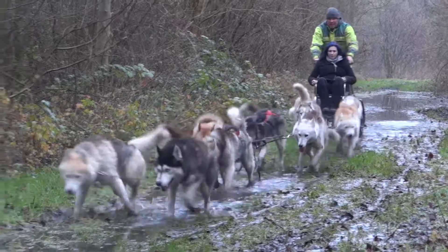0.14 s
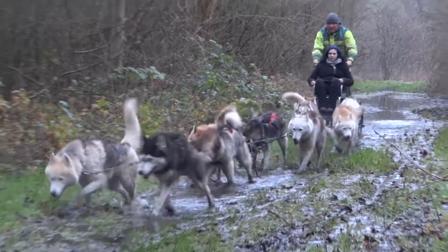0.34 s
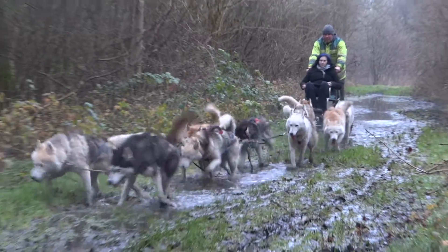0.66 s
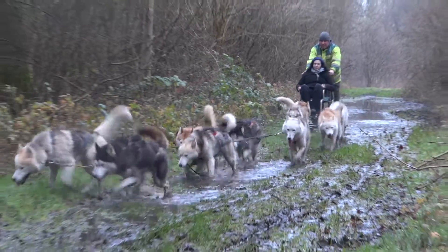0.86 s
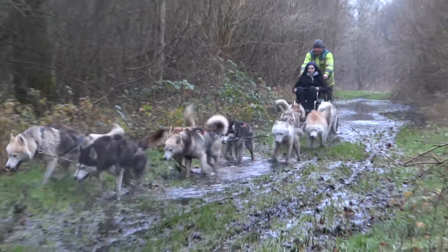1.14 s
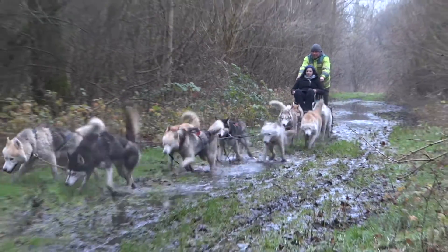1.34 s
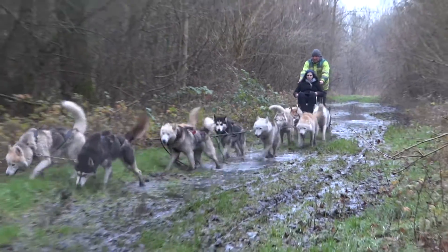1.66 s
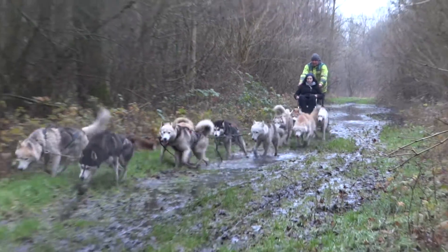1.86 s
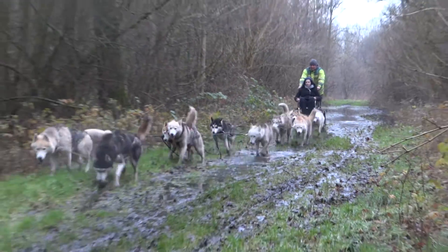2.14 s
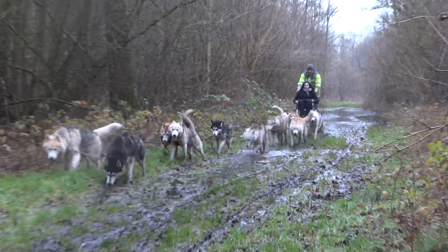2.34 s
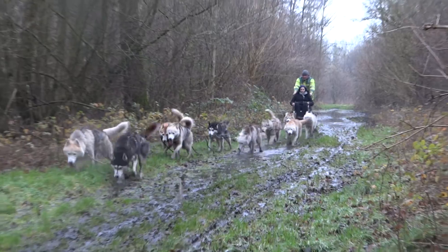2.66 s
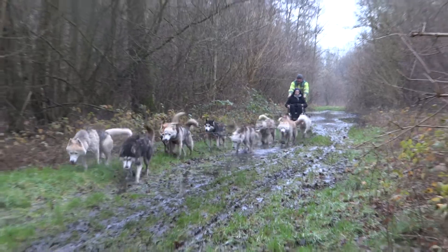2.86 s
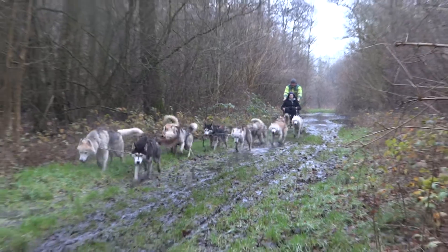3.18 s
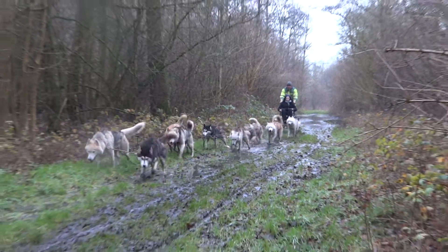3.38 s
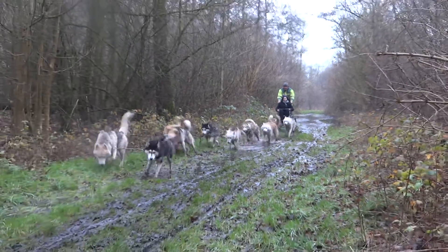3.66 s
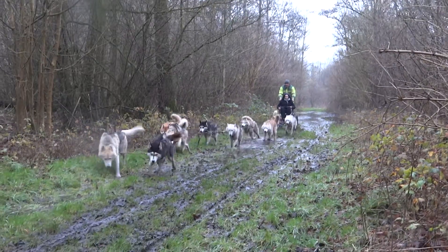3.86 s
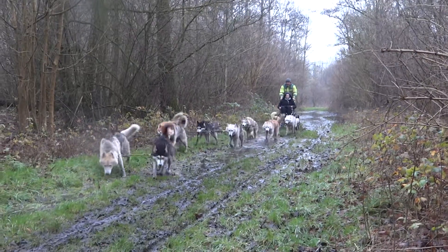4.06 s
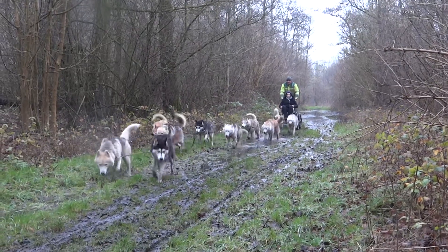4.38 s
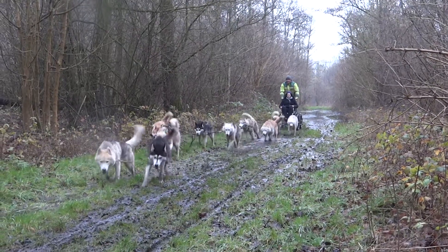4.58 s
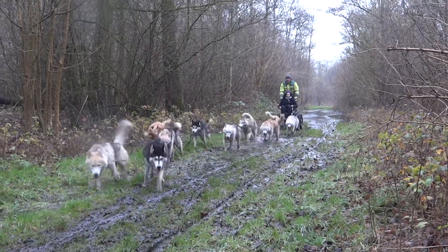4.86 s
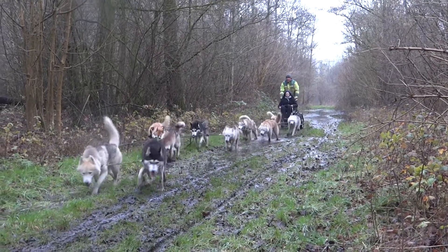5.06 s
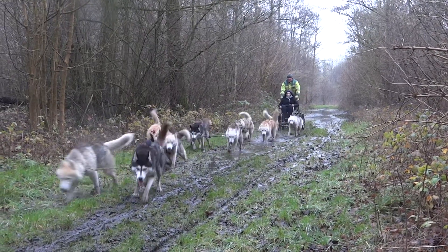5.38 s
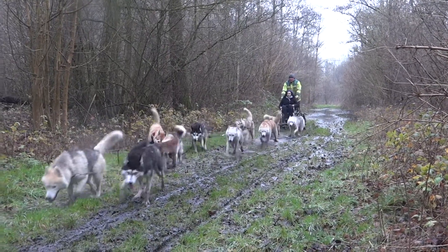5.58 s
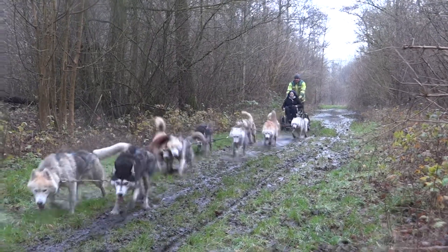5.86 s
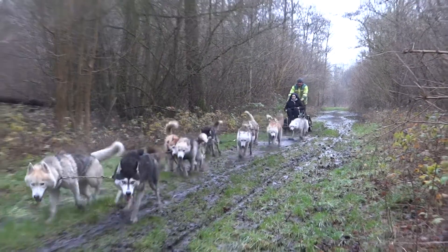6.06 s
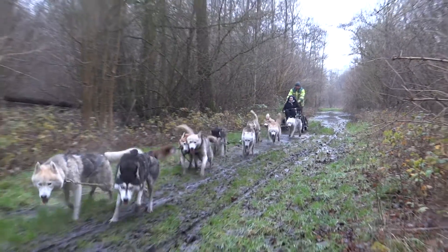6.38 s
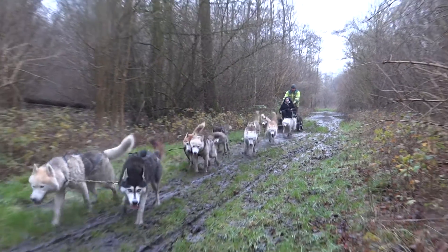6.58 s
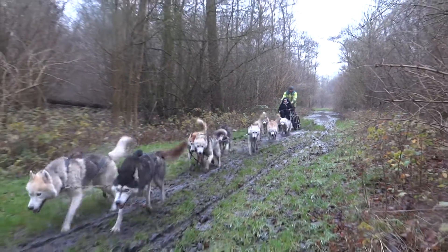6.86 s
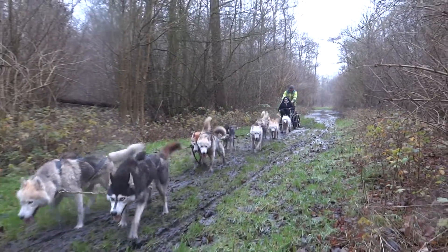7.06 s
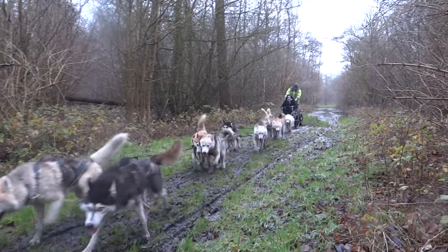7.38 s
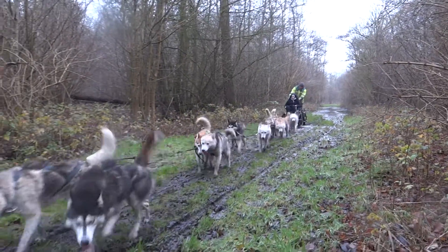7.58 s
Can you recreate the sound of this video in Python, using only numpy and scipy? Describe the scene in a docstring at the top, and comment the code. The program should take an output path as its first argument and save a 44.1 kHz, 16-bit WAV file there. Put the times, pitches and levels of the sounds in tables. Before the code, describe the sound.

On a muddy woodland track, many dog paws patter through wet ground and shallow puddles over a continuous squelching, bubbling churn. At 0 s it opens with a cluster of wet slaps and spray, with two faint breath puffs before 1 s. From about 1 to 3 s the splashing thins and softens, leaving scattered small splats, clearest near 2.7 s. From 3.5 s it builds again, with denser steps, crisp drop ticks and bright spray. Short husky dog pants come at about 4.4, 4.8, 5.1 and 5.4 s. The splashing peaks around 5.6-5.9 s, close and heavy, with hollow plops. Near 6.6 s a small woody knock sounds; more pants follow until 7.5 s among close, separate paw splashes, easing slightly. Behind is a soft forest hush, a faint wavering distant roar and barely audible engine drone. Narrow stereo, dry, with faint tree echo.

```python
"""A muddy forest track: a team of sled dogs pulls a cart toward closely spaced microphones.
Paws are filtered bursts of random clicks; mud, squelch and water are clouds of tiny rings over noise.
The churn thins, then grows as the team comes closer; the lead dog's panting is filtered noise puffs.
Bubbles and pockets in the mud plop, heavy drops tick and one woody knock rings, with echo from the trees.
Behind lie the noise hush of the wood, a far engine's wavering drones, a husky hum and a narrow roar."""
import sys
import numpy as np
from scipy import signal
from scipy.io import wavfile

SR = 44100
rng = np.random.default_rng(int(sys.argv[2]) if len(sys.argv) > 2 else 0)


def put_to_file(sound):
    """Save the sound as 16-bit audio at rate SR, in the file named by the first command-line argument."""
    columns = np.atleast_2d(sound).T  # one column per channel
    safe = np.clip(columns, -1, 1)
    whole_steps = np.round(safe * 32767)
    wavfile.write(sys.argv[1], SR, whole_steps.astype(np.int16))


N = 340893
TIME = np.arange(N) / SR
FREQS = np.fft.rfftfreq(N, 1 / SR)

# How hard the whole team works the ground, before each layer's own trim.
# Each row: time in seconds, churned mud in dB, squelch in dB, thrown water in dB.
TEAM = [(0.0, -50, -46, -45), (0.13, -48.5, -46, -48), (0.2, -50.5, -50.5, -52.5),
        (0.47, -53, -51.5, -52.5), (1.03, -52.5, -49.5, -50.5), (1.55, -54, -49.5, -52),
        (1.74, -52.5, -53, -54.5), (2.3, -54.5, -56.5, -59.5), (2.91, -52.5, -53.5, -53.5),
        (3.21, -52.5, -52, -53), (3.74, -51.5, -51.5, -55), (3.96, -49, -49.5, -49), (4.11, -49, -47, -47),
        (4.43, -47.5, -47.5, -48), (4.59, -47.5, -45.5, -44.5), (4.99, -46, -48.5, -48.5),
        (5.15, -47, -45, -44.5), (5.3, -46.5, -44.5, -43.5), (5.68, -46, -43.5, -44.5),
        (5.96, -50.5, -43, -44.5), (6.72, -51, -46.5, -45.5), (7.0, -53, -47.5, -46.5),
        (7.73, -50, -48.5, -49)]


def gain_of(db):
    """Decibels to amplitude."""
    return 10 ** (np.asarray(db) / 20)


def evened(x):
    """Scales to an rms of one."""
    return x / np.sqrt(np.mean(x ** 2) + 1e-20)


def read(points, hz):
    """A spectrum table, joined on a log-frequency axis."""
    f, value = np.transpose(points)
    return np.interp(np.log(hz + 1), np.log(f + 1), value)


def curves(rows):
    """The columns of a time table at every sample."""
    s, *columns = np.transpose(rows)
    return [np.interp(TIME, s, column) for column in columns]


def add(mix, s, sound):
    """Mixes a sound in from time s, or from the first sample if s is negative."""
    start = max(round(s * SR), 0)
    part = mix[..., start:][..., :sound.shape[-1]]
    part += sound[..., :part.shape[-1]]


def colour(x, db):
    """Causal, minimum-phase filter with the gain db on FREQS, so that clicks keep their sharp front."""
    taps_db = np.interp(np.fft.rfftfreq(4096, 1 / SR), FREQS, db)
    log_gain = np.log(gain_of(np.r_[taps_db, taps_db[-2:0:-1]]))
    # the Hilbert transform of the log gain gives the phase
    taps = np.fft.ifft(np.exp(np.conj(signal.hilbert(log_gain)))).real
    return signal.oaconvolve(x, taps[None, :len(taps) // 2], axes=1)[:, :N]


def resonate(x, hz, q):
    """A two-pole band-pass, its pitch capped and its q kept from falling too low."""
    hz = min(hz, SR / 4)
    return signal.lfilter(*signal.iirpeak(hz, max(q, 2.5 * hz / SR), SR), x)


def sweep(x, hz, width_hz):
    """A steep resonance that follows the curve hz: shift down to zero, low-pass, shift back."""
    turn = np.exp(2j * np.pi * np.cumsum(hz) / SR)
    low_pass = signal.butter(2, width_hz / 2, fs=SR, output="sos")
    return (turn * signal.sosfilt(low_pass, x / turn)).real


def ring(hz, db, decay):
    """One dying tone with a soft start."""
    t = np.arange(SR // 8) / SR
    envelope = (1 - np.exp(-2 * t * hz)) * np.exp(-t / decay)
    return gain_of(db) * envelope * np.sin(2 * np.pi * hz * t)


def drift(rate_hz):
    """Slow chance with an rms of one: random points, two per cycle of rate_hz, joined by lines."""
    knots = np.random.default_rng(rng.integers(2 ** 31)).standard_normal(4096)
    return evened(np.interp(TIME * rate_hz * 2, np.arange(len(knots)), knots))


def spread(pair):
    """Two unrelated signals become left and right of closely spaced microphones."""
    # Each row: frequency in Hz, left-right likeness from 0 to 1.
    likeness = [(60, 0.9), (130, 1), (270, 0.67), (560, 0.83), (1180, 0.7), (2490, 0.83), (5240, 0.94),
                (11000, 0.7)]
    same = np.clip(read(likeness, FREQS), 0, .995)
    mid = colour(pair[:1], 10 * np.log10((1 + same) / 2))
    side = colour(pair[1:], 10 * np.log10((1 - same) / 2))
    return np.vstack([mid + side, mid - side])


def droplets(per_s, lo_hz, hi_hz, cycles, spread_db, clump_db=1.0, width=0.34, size=256):
    """Tiny ringing drops and bubbles, each with its own pitch and loudness, falling in clumps."""
    t = np.arange(size) / SR
    crowd = gain_of(clump_db * drift(rate_hz=35))
    draws = np.random.default_rng(rng.integers(2 ** 31)).random((int(per_s * N / SR) + 1, 4))
    at, bulk, side, pitch = draws.T
    at = (at * N).astype(int)
    hz = lo_hz + (hi_hz - lo_hz) * pitch
    loudness = gain_of(spread_db * np.minimum(-np.log(1 - bulk), 4)) * crowd[at]
    turns = hz[:, None] * t
    # short rings hit harder, which keeps the spectrum even
    strength = (loudness * np.sqrt(hz))[:, None]
    rings = strength * np.exp(-turns / cycles) * np.sin(2 * np.pi * turns)
    where = (at[:, None] + np.arange(size)).ravel()
    pans = [1 + sign * width * (2 * side - 1) for sign in (1, -1)]
    return evened(np.array([np.bincount(where, (pan[:, None] * rings).ravel(), N)[:N] for pan in pans]))


def wet(grains, share, shape, flutter_db=1):
    """Near grains over a blur of farther ones, in one colour; share is the grains' part of the power."""
    share = np.clip(share, 0, 1)
    flutter = drift(rate_hz=30)
    blur = evened(spread(rng.standard_normal((2, N))) * gain_of(flutter_db * flutter))
    both = np.sqrt(share) * evened(grains) + np.sqrt(1 - share) * blur
    return evened(colour(both, read(shape, FREQS)))


def paws(slap_db=-2.0, spray_db=-2.5, slap_q=1.58, spray_q=1.7, smack_share=0.072, grit=0.54, width=0.31):
    """Each paw touches the water, smacks the mud and throws a burst of droplets; deep puddles last longer."""
    # The clearest paw falls and the mud they splat, before the trims slap_db and spray_db.
    # Each row: time in seconds, slap level in dB, slap pitch in Hz, spray level in dB,
    # spray pitch in Hz, splash decay in seconds.
    clear_paws = [(0.026, -46, 2980, -48, 7600.0, 0.008), (0.056, -41, 2200, -54, 6500, 0.05),
                  (0.087, -41, 1690.0, -43, 5000, 0.04), (0.133, -47, 1400, -43, 6000, 0.02),
                  (0.148, -42, 2010.0, -40, 6840, 0.047), (0.148, -53, 2980.0, -40.5, 7100.0, 0.002),
                  (0.32, -58, 2000, -43, 7300.0, 0.0071), (0.339, -48, 2600, -42, 6530, 0.022),
                  (0.364, -45, 1210, -50, 7000, 0.018), (0.414, -56, 2500, -57, 5500, 0.002),
                  (0.42, -63.0, 2250.0, -48, 7760, 0.003), (0.456, -54, 1520.0, -41, 6000.0, 0.02),
                  (0.558, -43, 1800, -59, 6000, 0.012), (0.575, -46, 2900, -59, 6000, 0.008),
                  (0.634, -41, 2900, -38, 5630, 0.022), (0.727, -43, 1270.0, -47, 7000.0, 0.007),
                  (0.744, -44, 1150, -51, 7000, 0.022), (0.834, -44.5, 1240, -49, 6400.0, 0.005),
                  (0.862, -49, 2320.0, -48, 7560, 0.0031), (0.947, -46.5, 2240.0, -44, 6700.0, 0.0035),
                  (0.962, -41, 2280.0, -35, 6700, 0.059), (1.001, -54.0, 2020.0, -42, 7200.0, 0.006),
                  (1.086, -56, 2400, -47, 6450, 0.003), (1.139, -47, 2810.0, -42, 5400.0, 0.0075),
                  (1.213, -53.5, 1940.0, -38.5, 6500, 0.049), (1.275, -47, 2700, -54, 6000, 0.004),
                  (1.339, -46, 2700, -53, 6000, 0.004), (1.403, -48, 1740.0, -43, 5570, 0.016),
                  (1.423, -45, 1600, -43, 5600, 0.0091), (1.556, -44, 1040, -48, 6000, 0.006),
                  (1.582, -52, 2390.0, -40, 5700.0, 0.028), (1.595, -50, 2700, -50, 5700, 0.0033),
                  (1.672, -46.5, 2500, -46, 5200.0, 0.009), (1.726, -52, 1750.0, -49, 5900.0, 0.008),
                  (1.756, -49, 2600, -61, 5900, 0.004), (1.893, -52, 1280.0, -49, 5500.0, 0.048),
                  (1.933, -56, 2300, -48, 6000, 0.0045), (1.955, -44, 2340, -41, 5500.0, 0.025),
                  (1.974, -56, 2300, -46, 6000, 0.0038), (1.992, -50, 2600, -48, 5500, 0.012),
                  (2.174, -52, 2600, -58, 6000, 0.004), (2.214, -55.5, 2170.0, -49.5, 6300.0, 0.038),
                  (2.296, -48, 1680, -43, 7100, 0.034), (2.383, -44, 1540.0, -48, 6900.0, 0.014),
                  (2.43, -53, 2340.0, -45, 4800, 0.014), (2.571, -53, 2400, -44, 8000.0, 0.0098),
                  (2.644, -60, 2400, -49, 6450, 0.003), (2.676, -56, 2400, -46, 6000, 0.003),
                  (2.686, -39.5, 2400, -38.5, 5570, 0.016), (2.72, -55, 2400, -46, 5960, 0.0055),
                  (2.739, -46, 2700, -52, 6000, 0.004), (2.845, -58, 1760.0, -48, 6500.0, 0.005),
                  (2.993, -60.0, 2020.0, -47, 5000.0, 0.006), (3.02, -61, 1290.0, -43.5, 5800, 0.011),
                  (3.074, -61, 2400.0, -45, 7800.0, 0.0055), (3.127, -58, 2200, -47, 5500, 0.0036),
                  (3.168, -60, 2060.0, -47, 7700.0, 0.004), (3.292, -44, 1500, -45.5, 5800.0, 0.015),
                  (3.334, -59.5, 1570.0, -39, 6600, 0.048), (3.391, -46, 1350.0, -43.5, 6360, 0.0022),
                  (3.485, -44, 2560.0, -42, 6400.0, 0.057), (3.507, -41.5, 2870, -57, 5000.0, 0.0035),
                  (3.665, -63, 1450.0, -48.0, 6700.0, 0.01), (3.694, -41, 2350, -39, 5700.0, 0.028),
                  (3.733, -44, 2600, -52, 5700, 0.005), (3.755, -46.5, 2430.0, -45, 5700.0, 0.0035),
                  (3.789, -63.0, 3000.0, -40, 6800, 0.017), (3.892, -50.5, 1220.0, -48.0, 7900.0, 0.006),
                  (3.936, -45, 2350.0, -45, 4430, 0.003), (3.955, -39, 2100.0, -45, 5300.0, 0.05),
                  (4.051, -45, 2190.0, -38, 5900.0, 0.017), (4.098, -42, 1920.0, -37, 5200, 0.019),
                  (4.19, -44, 1750.0, -41, 6500.0, 0.03), (4.214, -43.5, 2300, -51, 6000, 0.004),
                  (4.337, -45.0, 1600.0, -39.5, 7300.0, 0.019), (4.418, -50, 1400.0, -39.5, 5900.0, 0.046),
                  (4.462, -41, 2000.0, -40, 7700.0, 0.0082), (4.491, -45, 1290.0, -43, 7800.0, 0.0035),
                  (4.505, -54, 1900.0, -40, 7800.0, 0.033), (4.532, -42.5, 2140, -43, 6300.0, 0.003),
                  (4.615, -42, 1950.0, -38, 7260, 0.0035), (4.633, -51, 1850.0, -35, 7260, 0.0063),
                  (4.7, -39.5, 2100, -41, 6300.0, 0.003), (4.714, -52, 2200, -37, 6300, 0.017),
                  (4.818, -40, 2220.0, -39.5, 7240, 0.0088), (4.909, -37.5, 2400, -36, 7040, 0.011),
                  (4.925, -50, 2400, -36.5, 5500, 0.01), (4.978, -56, 2400, -49, 4600, 0.003),
                  (5.002, -46, 2010.0, -35, 6300.0, 0.016), (5.02, -36.5, 2270, -41, 5000, 0.003),
                  (5.026, -42, 2150, -50, 5300, 0.005), (5.117, -52, 1780.0, -40, 7400.0, 0.01),
                  (5.174, -45, 2100, -40, 5600, 0.013), (5.204, -48, 2200, -41, 6500, 0.004),
                  (5.283, -43, 2400, -48, 6000, 0.003), (5.299, -40, 2350.0, -34.5, 7750, 0.014),
                  (5.344, -35.5, 2240, -35.5, 6900.0, 0.0065), (5.389, -48.0, 1960.0, -42, 7300.0, 0.006),
                  (5.44, -45, 1710.0, -35, 6300.0, 0.014), (5.5, -41, 2720.0, -49, 5400.0, 0.0035),
                  (5.578, -35, 1760.0, -39, 7700.0, 0.015), (5.595, -40, 2400, -42, 6500, 0.005),
                  (5.683, -45, 1900, -31.5, 7100.0, 0.078), (5.714, -40.0, 1730.0, -36.5, 7100.0, 0.01),
                  (5.792, -33, 1380.0, -42, 8600.0, 0.011), (5.812, -39.5, 1780.0, -34, 8700.0, 0.017),
                  (5.87, -38, 2040.0, -29, 7150, 0.053), (5.892, -40, 2990.0, -34.5, 7800.0, 0.005),
                  (5.91, -36, 2210.0, -49, 6100.0, 0.004), (5.931, -38.5, 1240, -42, 6000, 0.0038),
                  (5.966, -50.0, 2000.0, -38, 5500.0, 0.018), (6.037, -54, 2050.0, -41.5, 6200.0, 0.016),
                  (6.055, -46, 2500, -48, 6000, 0.0027), (6.077, -51, 1910.0, -43.0, 5800.0, 0.0035),
                  (6.086, -60.0, 3000.0, -36.5, 7900.0, 0.006), (6.114, -50, 2500, -36, 6100.0, 0.013),
                  (6.121, -36.5, 2580, -42, 5500, 0.004), (6.192, -53, 2450.0, -39, 5600.0, 0.01),
                  (6.246, -38, 1800.0, -41, 4700.0, 0.013), (6.277, -48, 1780.0, -37, 5700.0, 0.006),
                  (6.301, -42, 2700, -40, 6300, 0.006), (6.417, -38.5, 2040.0, -32.5, 6800.0, 0.018),
                  (6.449, -50, 2270.0, -42, 7400.0, 0.002), (6.517, -37.5, 2300, -48, 5400.0, 0.007),
                  (6.592, -45, 1580.0, -46, 7360, 0.0039), (6.668, -57, 2320.0, -36, 6100, 0.011),
                  (6.802, -39.5, 2470.0, -41, 5800.0, 0.01), (6.824, -45, 1610.0, -34.0, 7900.0, 0.033),
                  (6.887, -36, 1660.0, -36, 6600.0, 0.026), (6.986, -42, 2320.0, -36, 5850, 0.037),
                  (7.003, -58.0, 2730.0, -37, 4870, 0.0035), (7.132, -37, 2150.0, -40, 6000, 0.03),
                  (7.177, -43, 1990, -42, 6500, 0.004), (7.229, -44, 1920.0, -40, 6840, 0.006),
                  (7.241, -48, 2000, -45, 6500, 0.003), (7.262, -38.5, 2700.0, -35, 7500, 0.023),
                  (7.36, -36, 2200, -42, 5000, 0.0076), (7.389, -45, 2300.0, -42, 5000.0, 0.016),
                  (7.478, -63, 1170.0, -40, 8200.0, 0.0079), (7.56, -49, 1640.0, -40, 7800, 0.0043),
                  (7.609, -60.5, 1840.0, -43, 6700.0, 0.01), (7.628, -56, 2000, -44, 6700, 0.004),
                  (7.644, -46, 2300, -50, 6000, 0.005)]
    smack_s = 0.0016  # decay of the smack
    touch_share = 0.24  # lead-in as the toes touch, as a share of the splash decay
    out, lead = np.zeros((2, N)), SR // 25
    t = np.arange(-lead, SR // 10) / SR
    smack = evened((t >= 0) * np.exp(-abs(t) / smack_s))
    share = np.clip(smack_share, 0, 1)
    for s, slap, slap_hz, spray, spray_hz, decay in list(clear_paws) + light_paws():
        splash = evened(np.exp(-abs(t) / np.where(t < 0, touch_share * decay, decay)))
        envelope = np.sqrt(share * smack ** 2 + (1 - share) * splash ** 2)
        lean = 1 + width * rng.uniform(-1, 1) * np.array([[1], [-1]])
        for db, hz, q in ((slap + slap_db, slap_hz, slap_q), (spray + spray_db, spray_hz, spray_q)):
            roughness = np.exp(grit * np.clip(rng.standard_normal(len(t)), -3, 3))
            clicks = rng.choice([-1, 1], len(t)) * roughness * envelope
            clumps = signal.resample(rng.standard_normal(70), len(t))
            clicks *= gain_of(2 * clumps)  # the water tears away in ragged clumps
            burst = resonate(resonate(clicks, hz, q), hz, q / 2)
            # every burst has the energy of 10 ms at its level
            burst *= np.sqrt(SR / 100) / np.linalg.norm(burst)
            add(out, s + t[0], lean * gain_of(db) * burst)
    return out


def light_paws(per_s=12, slap_db=-18, spray_db=-3.5, spread_db=6, slap_hz=2100, spray_hz=6200, decay_s=0.0022):
    """Paw rows for the rest of the team: random moments, with levels that follow squelch and water."""
    _, squelch_db, water_db = curves(TEAM)
    draws = np.random.default_rng(rng.integers(2 ** 31)).random((int(per_s * N / SR), 3))
    rows = []
    for moment, strength, depth in draws:
        i = int(moment * N)
        extra_db = spread_db * (2 * strength - 1)
        slap = squelch_db[i] + slap_db + extra_db
        spray = water_db[i] + spray_db + extra_db
        rows.append((i / SR, slap, slap_hz, spray, spray_hz, decay_s * (.5 + depth)))
    return rows


def churn(mud_db=1.82, squelch_db=4.0, water_db=2.5, hush_db=-54.0):
    """Many paws and the wheels: bubbling mud below, squelching in the middle, crackling water above."""
    # The colours of the three layers. Each row: frequency in Hz, relative level in dB.
    mud_shape, squelch_shape, water_shape = [(150, -52), (380, -18), (500, -9), (680, -0.5), (950, 1),
                                             (1500, -2.5), (2400, -6), (4000, -39), (9000, -59)], [(300, -25.5), (800, -4.5), (1400, -1.5),
                                                          (2500, 3), (4000, 2.5), (5000, 2), (6500, 1.5),
                                                          (11000, -37)], [(500, -76), (2500, -5),
                                                                           (4500, -3.5), (6000, 2),
                                                                           (8200, -1.5), (9400, -1.5),
                                                                           (10300, -5), (11200, -13)]
    mud_level, squelch_level, water_level = (gain_of(db) for db in curves(TEAM))
    # the mud only counts where it rises over the hush of the wood
    mud_level = np.sqrt(np.maximum(mud_level ** 2 - gain_of(hush_db) ** 2, gain_of(-72.0) ** 2))
    bubbles = droplets(per_s=1300, lo_hz=447.0, hi_hz=2662, cycles=7.1, spread_db=2.0, size=800)
    # bursting films of water click across the whole treble; trapped air rings a little longer
    clicks = droplets(per_s=1400, lo_hz=1200, hi_hz=11000, cycles=.7, spread_db=3.4, size=100)
    drips = droplets(per_s=1000, lo_hz=1300, hi_hz=9000, cycles=11, spread_db=2.5, size=800)
    crackle = clicks + gain_of(-2) * drips
    mud = wet(bubbles, share=0.4, shape=mud_shape)
    squelch = wet(crackle, share=0.77, shape=squelch_shape)
    water = wet(crackle, share=0.59, shape=water_shape)
    ground = gain_of(mud_db) * mud_level * mud + gain_of(squelch_db) * squelch_level * squelch
    return ground + gain_of(water_db) * water_level * water


def small_bubbles(db=-10):
    """Many small bubbles ping through the churn, their level following the squelch."""
    _, squelch_db, _ = curves(TEAM)
    pings = droplets(per_s=63, lo_hz=2804, hi_hz=8980, cycles=19, spread_db=2.5, clump_db=-1, size=1200)
    return gain_of(squelch_db + db) * pings


def plops(lowest_hz=200, decay_at_1khz_s=0.0066, size_law=0.55):
    """A bubble or a hollow pocket in the mud rings as it closes; larger, lower ones ring longer."""
    # The clearest plops, from low hollow pockets to small high bubbles.
    # Each row: time in seconds, pitch in Hz, level in dB before the high-pass.
    closings = [(0.026, 2950, -31), (0.075, 322, -49), (0.148, 747, -42), (0.632, 2650, -36),
                (0.638, 3250, -38), (3.109, 3370, -44), (4.135, 408, -44.5), (5.59, 576, -38.5),
                (5.774, 250, -48), (5.791, 1074, -30), (6.04, 2270, -36), (6.285, 1700, -31),
                (6.624, 284, -50), (6.987, 2470, -30.5), (7.263, 3000, -33), (7.36, 248, -51),
                (7.36, 966, -35)]
    out = np.zeros((2, N))
    for s, hz, db in closings:
        add(out, s, ring(hz, db, decay_at_1khz_s * (1000 / hz) ** size_law))
    return signal.sosfilt(signal.butter(2, lowest_hz, "highpass", fs=SR, output="sos"), out)


def drops(db=-5.5, patter=0.2, patter_s=0.00057):
    """A heavy drop hits a puddle: one crisp tick, then a moment of fine patter."""
    # Each row: time in seconds, peak level in dB before the trim db, pitch in Hz.
    heavy_drops = [(.0266, -33, 3200), (.148, -23, 7100), (.862, -22, 7500), (1.404, -29, 5000),
                   (2.302, -23, 7200), (3.168, -21.5, 8000), (3.7905, -20.5, 7000), (3.936, -21, 4370),
                   (4.099, -23, 4500), (4.338, -19, 7000), (4.505, -15, 7400), (4.6325, -16.5, 7400),
                   (4.7, -21.5, 5030), (4.817, -20, 7000), (4.9005, -24, 6500), (4.91, -34, 4000),
                   (5.173, -17, 7000), (5.301, -19, 6500), (5.3426, -30, 3500), (5.443, -22, 5000),
                   (5.579, -23, 1980), (5.792, -25, 1400), (5.812, -15, 8400), (5.8695, -17, 7000),
                   (5.894, -19, 7500), (5.967, -24, 6000), (6.251, -21, 4500), (6.277, -18, 6000),
                   (6.302, -13, 6300), (6.418, -20, 7500), (6.45, -23, 7500), (6.828, -20, 8500),
                   (6.631, -12, 7550), (6.888, -22, 7000), (7.003, -19, 5400), (7.2619, -17.5, 7800),
                   (7.3605, -22, 3000)]
    out, t = np.zeros((2, N)), np.arange(SR // 100) / SR
    for s, peak_db, hz in heavy_drops:
        hit = (t == 0) + patter * rng.standard_normal(len(t)) * np.exp(-t / patter_s)
        tick = resonate(resonate(hit, hz, 1.5), hz, .75)
        add(out, s, gain_of(peak_db + db) * tick / abs(tick).max())
    return out


def panting(throat_width_hz=430, muzzle_width_hz=560, chest_ratio=0.765, chest_db=-8, edges=0.46,
            lowest_hz=750, flutter_db=1.0, spit_per_s=220, spit_share=.25):
    """Puffs of air through the dog's wet throat and muzzle; the resonances slide as the jaw moves."""
    # The lead dog's breaths. Each row: middle in seconds, length in seconds, throat level in dB,
    # muzzle level in dB, throat pitch in Hz, muzzle pitch in Hz, glide as a share of the pitch.
    breaths = [(0.372, 0.077, -51.5, -62, 1260, 2500, 0.13), (0.75, 0.066, -49, -66, 1250, 2500, 0),
               (4.42, 0.085, -44, -53, 1410, 2500, -0.07), (4.774, 0.083, -53, -47.5, 1400, 3100, -0.075),
               (5.069, .13, -44, -53, 1550, 2600, -0.031), (5.416, .1, -44.5, -51, 1400, 2700, -0.022),
               (6.569, .135, -41.5, -47.5, 1660, 2390, -.1), (6.867, .09, -41.5, -56, 1520, 2500, 0.2),
               (7.188, 0.12, -45.5, -49, 1540, 2230, -0.27), (7.531, 0.11, -41, -51, 1580, 2420, 0.082)]
    out, share = np.zeros((2, N)), np.clip(spit_share, 0, 1)
    for s, length, throat_db, muzzle_db, throat_hz, muzzle_hz, glide in breaths:
        rush, pops = rng.standard_normal((2, SR // 2))[:, :int(length * SR)]
        # saliva crackles in the airflow
        spit = np.sign(pops) * (rng.random(SR // 2)[:len(rush)] < spit_per_s / SR)
        air = np.sqrt(1 - share) * rush + np.sqrt(share) * evened(spit)
        air = air * gain_of(flutter_db * drift(rate_hz=57.3)[:len(air)])  # the tongue flaps
        jaw = 1 + glide * np.linspace(-.5, .5, len(air))
        throat = (throat_db, throat_hz, throat_width_hz)
        chest = (throat_db + chest_db, throat_hz * chest_ratio, throat_width_hz)
        muzzle = (muzzle_db, muzzle_hz, muzzle_width_hz)
        for db, hz, width_hz in (throat, chest, muzzle):
            puff = evened(sweep(air, hz * jaw, width_hz))
            add(out, s - length / 2, gain_of(db) * puff * signal.windows.tukey(len(air), edges))
    return signal.sosfilt(signal.butter(2, lowest_hz, "highpass", fs=SR, output="sos"), out)


def clack(at_s=6.6255, lowest_hz=800, highest_hz=3400, order=3):
    """A paw knocks something hard close by, perhaps a stick: a few short, woody rings."""
    # Each row: pitch in Hz, level in dB before the band-pass, decay in seconds.
    modes = [(1130, -20, 0.0013), (2170, -11, 0.0014), (2850, -12.5, 0.00094)]
    out = np.zeros((2, N))
    add(out, at_s, sum(ring(*mode) for mode in modes))
    band = signal.butter(order, [lowest_hz, highest_hz], "bandpass", fs=SR, output="sos")
    return signal.sosfilt(band, out)


def trees(x, t60=0.071, count=6):
    """Trunks and undergrowth scatter a faint, short echo; its random patterns take turns, so no pitch stands out."""
    t, out = np.arange(SR // 4) / SR, np.zeros((2, N))
    for k in range(count):
        sparse = rng.standard_normal((2, len(t))) * (rng.random((2, len(t))) < 2000 / SR)
        taps = sparse * (t > .004) * gain_of(-60 * t / t60)
        # the echo patterns fade into one another, a tenth of a second apart
        place = np.cos(np.pi / 2 * np.minimum(abs((10 * TIME - k) % count - 1), 1))
        out += signal.oaconvolve(x * place, taps / np.linalg.norm(taps[0]), axes=1)[:, :N]
    return out


def distance(wood_db=-51, low_hz=81.4, high_hz=109, hum_hz=297, waver=0.0329, octave_db=-9):
    """The noise hush of the wood, a far engine's two wavering drones, and a faint, husky hum."""
    # Colour of the hush. Each row: frequency in Hz, relative level in dB.
    wood_shape = [(25, -52), (50, -18), (80, -14.5), (130, -14.5), (230, -13.5), (400, -12.5), (650, -6.5),
                  (800, -5), (1000, 0), (1400, -2.5), (2000, -8.5), (4000, -16), (11000, -22.5)]
    # Each row: time in seconds, low drone in dB, high drone in dB, hum in dB; the drones also waver.
    engine = [(0, -75, -79, -70), (.5, -68.5, -82, -89), (1, -76, -83, -85), (2.5, -77, -81, -86),
              (3.7, -74, -74, -70), (4.4, -83, -78.5, -73.5), (5.3, -88, -75, -79), (6, -80, -85, -72),
              (7.7, -87, -77, -75.5)]
    hush = colour(spread(rng.standard_normal((2, N))), read(wood_shape, FREQS))
    air = gain_of(wood_db) * evened(hush)
    low_db, high_db, hum_db = curves(engine)
    for hz, db, octave in ((low_hz, low_db, gain_of(octave_db)), (high_hz, high_db, 0)):
        angle = 2 * np.pi * np.cumsum(hz * (1 + waver * drift(rate_hz=4.5))) / SR
        drone = np.sqrt(2) * (np.sin(angle) + octave * np.sin(2 * angle))
        air = air + gain_of(db + 2 * drift(rate_hz=5)) * drone
    return air + gain_of(hum_db) * evened(resonate(rng.standard_normal(N), hum_hz, q=9))


def far_roar(db=-58, hz=1010, width_hz=170, waver=0.045, swell_db=3.0):
    """A narrow roar of noise, like tyres on a distant road, that wavers in pitch and level."""
    centre = hz * (1 + waver * drift(rate_hz=3))
    roar = np.array([sweep(noise, centre, width_hz) for noise in rng.standard_normal((2, N))])
    return gain_of(db) * evened(spread(roar) * gain_of(swell_db * drift(rate_hz=5.5)))


def scene(echo_db=-15):
    """The team on the track, among the trees."""
    team = paws() + churn() + small_bubbles() + plops() + drops() + panting() + clack()
    background = distance() + far_roar()
    return team + gain_of(echo_db) * trees(team) + background


def record(dry, edge_hz=11080):
    """The camera body's colour and the microphones' balance, then a steep upper band limit."""
    # Narrow peaks and dips. Each row: centre in Hz, width in Hz (two standard deviations), gain in dB.
    body = [(1240, 120, -0.7), (1700, 140, -1), (2000, 320, -2), (2280, 200, -1), (2570, 300, 1.5),
            (2980, 220, -1.2), (3280, 260, 2.5), (3660, 220, -2.8), (4120, 220, 1.8), (4660, 280, 3.2),
            (5570, 200, -2.3), (6280, 200, -2.5), (6680, 200, 2.5), (6980, 200, -2.3), (7400, 280, 2.2),
            (7800, 220, -1.3), (8250, 280, 1.8), (8950, 220, 2)]
    # Each row: frequency in Hz, left minus right in dB.
    balance = [(250, 0), (560, -2), (1180, -1.5), (2500, 0), (11000, -0.5)]
    ripple_db = sum(db * np.exp(-2 * ((FREQS - hz) / width) ** 2) for hz, width, db in body)
    lean_db = read(balance, FREQS) / 2
    heard = np.vstack([colour(dry[:1], ripple_db + lean_db), colour(dry[1:], ripple_db - lean_db)])
    low_pass = signal.firwin(511, edge_hz, window=("kaiser", 8), fs=SR)
    return signal.oaconvolve(heard, low_pass[None], "same")


dry = scene()
out = record(dry)
put_to_file(out)
```